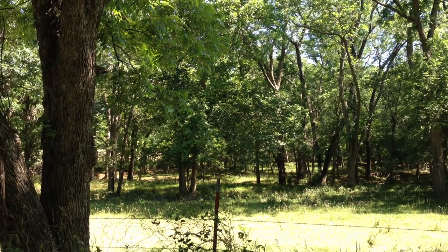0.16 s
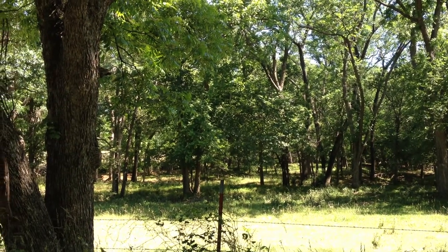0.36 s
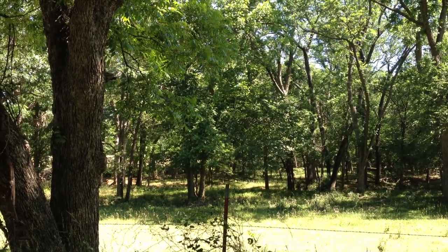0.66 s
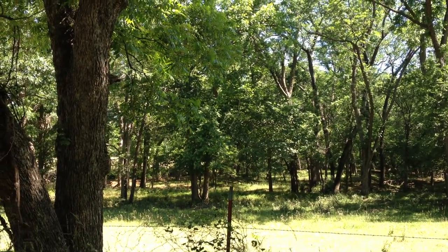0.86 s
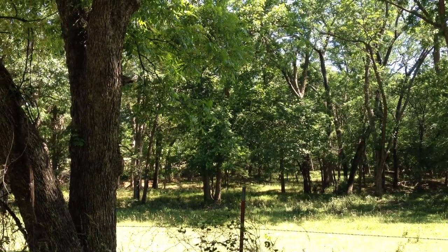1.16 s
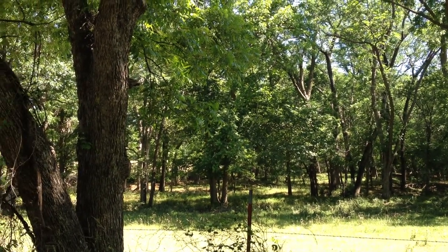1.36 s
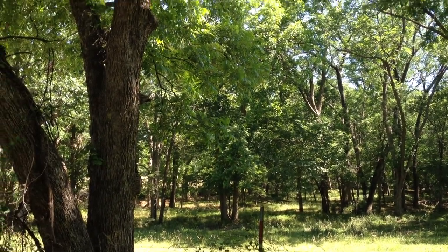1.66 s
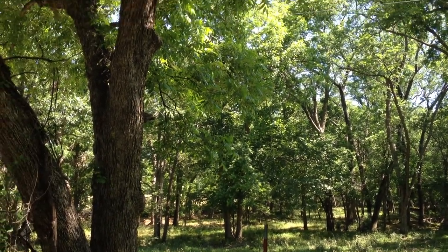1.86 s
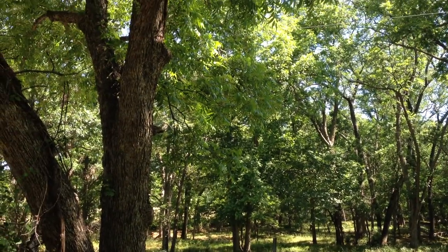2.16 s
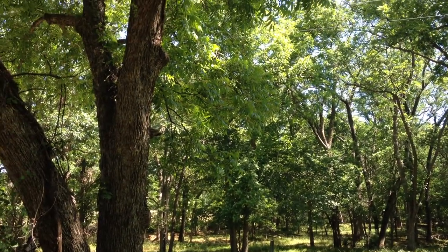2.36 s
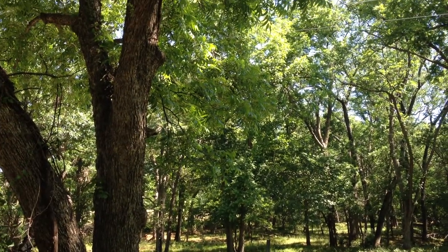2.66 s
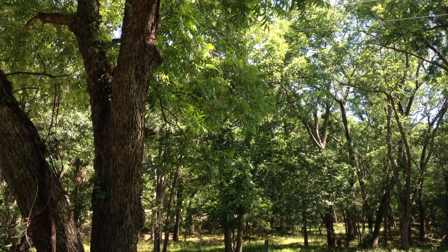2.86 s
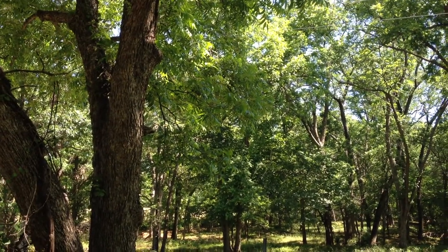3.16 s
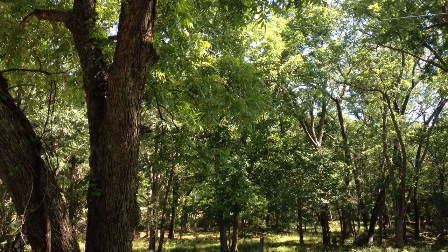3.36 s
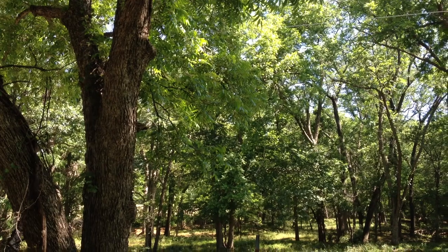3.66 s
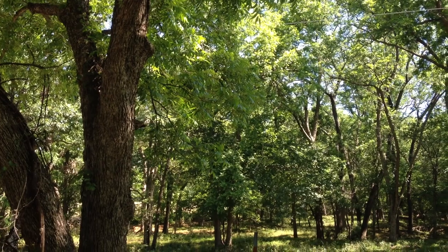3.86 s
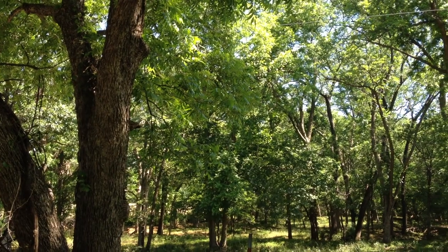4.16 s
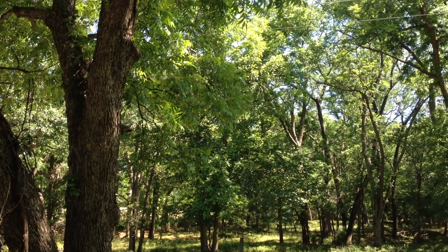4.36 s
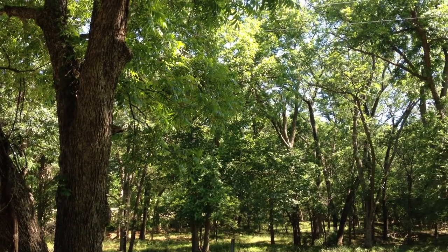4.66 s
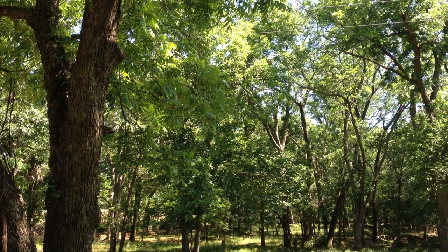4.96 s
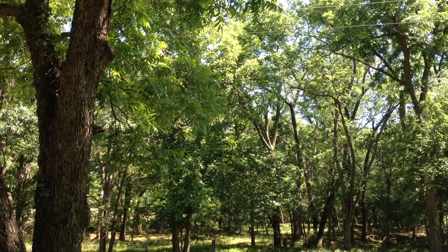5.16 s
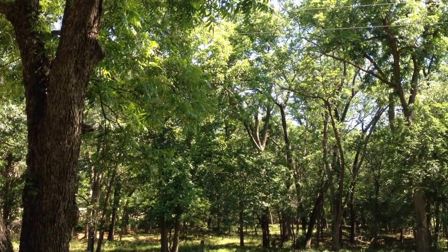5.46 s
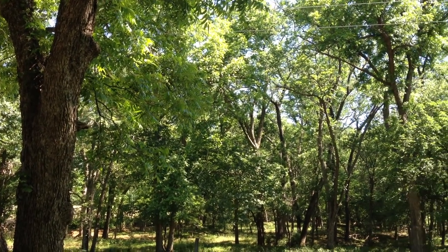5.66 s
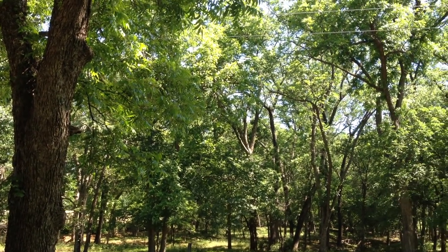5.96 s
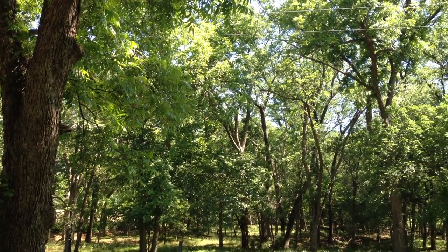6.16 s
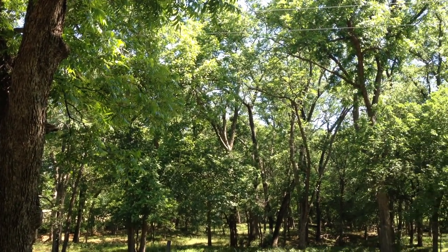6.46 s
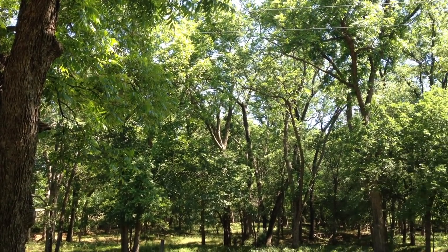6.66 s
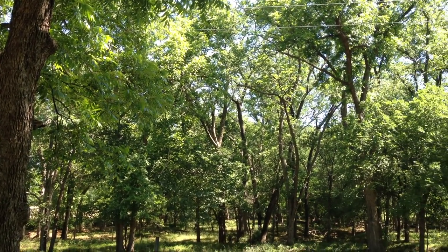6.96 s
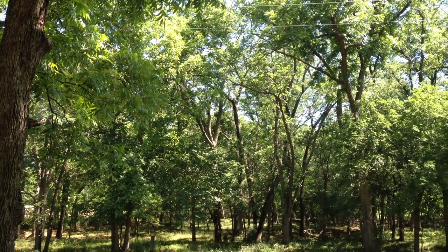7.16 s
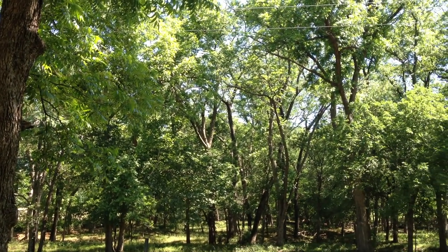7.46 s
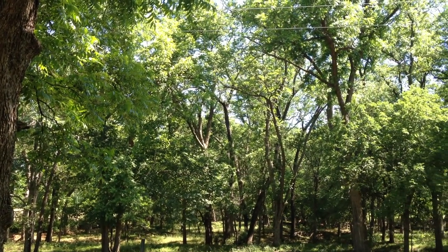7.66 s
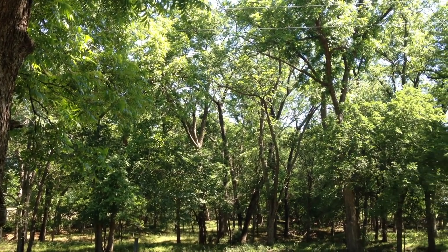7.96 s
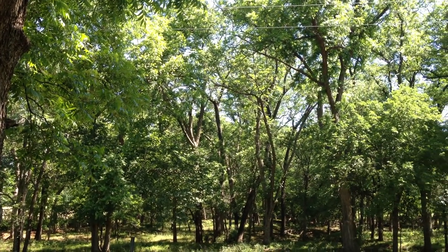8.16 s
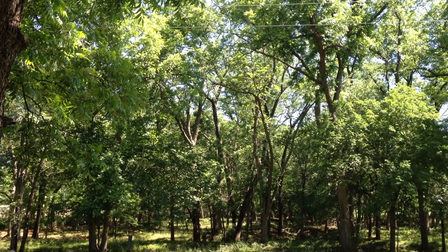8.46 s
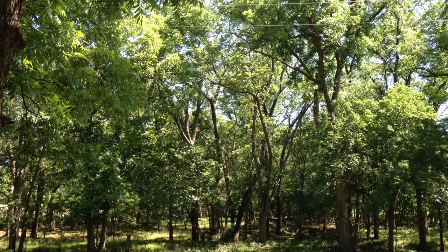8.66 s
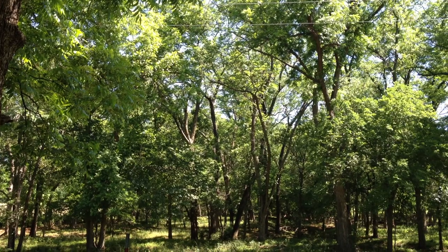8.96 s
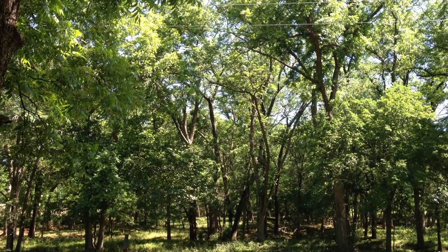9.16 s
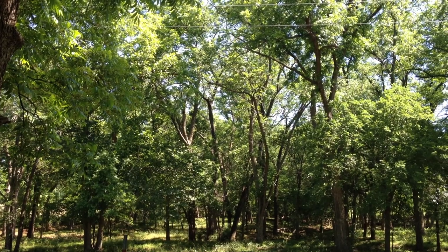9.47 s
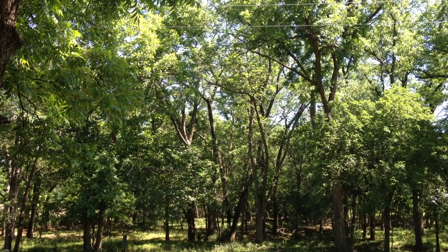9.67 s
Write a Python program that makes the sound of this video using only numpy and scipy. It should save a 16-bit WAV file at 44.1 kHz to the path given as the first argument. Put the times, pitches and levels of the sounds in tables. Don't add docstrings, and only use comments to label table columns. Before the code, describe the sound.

Massed cicadas in the trees make a bright, sizzling, slightly fluttering buzz all around, never silent. It breathes in slow waves: fading first, climbing over several seconds, dropping in about one and a half, then climbing again and starting to fade. Close to the camera microphone, fingers knock and tick softly on hollow plastic. Low handling rumble and thin hiss lie beneath, with one very faint far bird midway.

```python
import sys
import numpy as np
from scipy import signal
from scipy.fft import rfft, irfft, next_fast_len
from scipy.io import wavfile
from scipy.ndimage import uniform_filter1d

SR = 44100
rng = np.random.default_rng(int(sys.argv[2]) if len(sys.argv) > 2 else 0)


def ratio(d):
    e = np.asarray(d, float) / 20
    return 10 ** e


def master_out(mix):
    frames = np.transpose(np.atleast_2d(mix))
    ceiling = np.clip(frames, -1, 1)
    pcm = np.round(ceiling * 32767).astype(np.int16)
    wavfile.write(sys.argv[1], SR, pcm)


N = 432180

# crest_s, crest_level_db, overtone_against_ring_db, rise_s, fall_s
WAVES = [
    (-1.0, -28, 2, 3.8, 1.52),
    (4, -22, -0.7, 3.71, 1.42),
    (9, -22.5, 1.5, 3.26, 2.2),
]


def evened(x):
    return x / np.sqrt(np.mean(x ** 2) + 1e-20)


def colour(x, points, detune=1):
    size = next_fast_len(N)
    hz = np.fft.rfftfreq(size, 1 / SR)
    point_hz, point_db = np.transpose(points)
    gain = ratio(np.interp(np.log(hz + 1), np.log(point_hz * detune), point_db))
    return irfft(rfft(x, size) * gain, size)[:N]


def drift(top_hz, count):
    t = np.arange(0, N + 256, 256) / SR
    rate_hz = np.geomspace(1.5, top_hz, count)[:, None]
    sines = np.sin(2 * np.pi * (rate_hz * t + rng.random((count, 1))))
    slow = evened((sines / np.sqrt(rate_hz)).sum(0))
    return np.interp(np.arange(N) / SR, t, slow)


def add(mix, start_s, sound):
    part = mix[round(start_s * SR):][:len(sound)]
    part += sound[:len(part)]


def wave(lag_s):
    rise_bend, fall_bend, blur_s = 1.29, 1.37, 0.28
    crest_s, _, _, rise_s, fall_s = np.transpose(WAVES)[:, :, None]
    from_crest_s = np.arange(N) / SR - lag_s - crest_s
    rise = np.clip(1 + from_crest_s / rise_s, 0, 1) ** rise_bend
    fall = np.clip(from_crest_s / fall_s, 0, 1) ** fall_bend
    return uniform_filter1d(rise - fall, size=int(blur_s * SR), axis=1)


def tree(detune, flutter_db=0.49):
    # pitch_hz, level_db
    body_ring = [(1400, -65.5), (2100, -39.5), (2900, -30.5), (3300, -24), (3750, -13.5), (4300, -6.5),
                 (4900, -6), (5600, -5.5), (6300, 0), (6750, -4), (7200, -11.5), (7700, -15), (8600, -17),
                 (9200, -26), (9700, -46)]
    # pitch_hz, level_db
    body_overtone = [(9000, -71.5), (9700, -35), (10400, -31), (11400, -25.5), (12500, -27), (13300, -34.5),
                     (14200, -43), (15200, -46.5), (16000, -33)]
    clicks_per_s = 16000
    clicks = rng.choice([-1., 1.], N) * (rng.random(N) < clicks_per_s / SR)
    clicks = clicks * ratio(flutter_db * drift(30, count=24))
    return colour(clicks, body_ring, detune), colour(clicks, body_overtone, detune)


def chorus(size_spread=0.04):
    lull_db = -32.5
    low_buzz_hz, low_lull_db, low_crest_db = 5170, -1.5, -3.37
    low_lag_s, overtone_lag_s = 0.064, 0.063
    overtone_swell = 1.01

    _, crest_db, bright_db, _, _ = np.transpose(WAVES)
    ring_wave, low_wave, overtone_wave = wave(0), wave(low_lag_s), wave(overtone_lag_s)
    swell_db = crest_db - lull_db
    ring_db = lull_db + swell_db @ ring_wave
    low_db = lull_db + swell_db @ low_wave
    low_db = low_db + low_lull_db + (low_crest_db - low_lull_db) * low_wave.sum(0)
    overtone_db = lull_db + overtone_swell * (swell_db @ overtone_wave) + bright_db @ overtone_wave

    trees = [tree(1 + size_spread * d) for d in np.linspace(-1, 1, num=7)]
    ring, overtone = np.sum(trees, axis=0)
    low = colour(ring, [(low_buzz_hz - 400, 0), (low_buzz_hz + 400, -30)])
    high = ring - low
    return (ratio(ring_db) * high + ratio(low_db) * low + ratio(overtone_db) * overtone) / np.std(high)


def camera_floor():
    # pitch_hz, level_db
    rumble_spectrum = [(15, -59), (25, -29), (59, -31), (79, -13.5), (176, -1.5), (394, -8), (528, -8),
                       (605, -10), (659, -10), (1030, -11), (1500, -11), (1950, -15), (3300, -120)]
    rumble_db, rumble_drift_db, hiss_db = -73, .7, -67
    rumble = evened(colour(rng.standard_normal(N), rumble_spectrum))
    hiss = evened(colour(rng.standard_normal(N), [(1000, -18), (1700, 5), (9000, 3.5), (15000, -1)]))
    return ratio(rumble_db + rumble_drift_db * drift(25, count=24)) * rumble + ratio(hiss_db) * hiss


def knocks(tick_s=0.00014, thud_t60=0.054):
    # start_s, thud_db, thud_hz
    finger_pads = [(0.226, -59, 128), (1, -58, 148), (1.375, -58, 169), (1.6835, -56.5, 164),
                   (1.705, -63, 215), (1.9805, -67, 237), (2.0316, -55.5, 172), (3.486, -59, 236),
                   (3.653, -59, 143), (3.9106, -58, 307), (4.1448, -59, 160), (4.2336, -47, 157),
                   (4.663, -55.5, 172), (5.332, -61, 199), (5.6295, -62, 151), (5.7193, -58, 158),
                   (6.096, -64.5, 196), (6.275, -64, 202), (6.9458, -61, 145), (7.367, -64, 180),
                   (7.831, -59, 178), (7.863, -53.5, 170), (8.2943, -58, 178), (8.833, -60, 128),
                   (9.1487, -63, 205)]
    # start_s, tick_db, thud_db
    nail_snaps = [(1.7704, -59, -64), (2.301, -64, -66), (3.508, -55, -54), (3.7889, -59, -63),
                  (4.727, -59, -72), (4.8754, -46, -58), (5.346, -50, -58), (5.3592, -60, -66),
                  (5.7436, -59, -71), (5.9135, -47, -58), (6.028, -53, -59), (6.042, -64, -67),
                  (7.7344, -63, -62)]
    pad_tick_db, pad_firmness = -8.5, .42
    nail_thud_hz = 154
    pads = [(s, db + pad_tick_db + pad_firmness * (db + 60), db, hz) for s, db, hz in finger_pads]
    nails = [(s, tick_db, thud_db, nail_thud_hz) for s, tick_db, thud_db in nail_snaps]

    out, t = np.zeros(N), np.arange(3000) / SR
    lead_s = 90 / SR
    after_s = np.maximum(t - lead_s, 0)
    for start_s, tick_db, thud_db, thud_hz in pads + nails:
        softness_db = .4 * np.clip(thud_db - tick_db + 6, 0, 14)
        u = (t - lead_s) / (tick_s * ratio(softness_db))
        dip, rebound = 0.093 * np.exp(-(u + 5) ** 2 / 9), 0.4 * np.exp(-(u - 5) ** 2 / 9)
        tick = np.exp(-u ** 2 / 2) - rebound - dip
        turns = thud_hz * (.8 * after_s + 0.0044 * (1 - np.exp(-after_s / 0.0027)))
        thud = np.sin(2 * np.pi * turns) * ratio(thud_db + 3.5 - 60 * t / thud_t60)
        add(out, start_s - lead_s, ratio(tick_db + 7.0) * tick + thud)
    return signal.sosfilt(signal.butter(3, 105, "high", fs=SR, output="sos"), out)


def bird():
    # start_s, length_s, start_hz, end_hz, level_db
    peeps = [
        (5.5, .14, 1550, 2050, -77),
        (5.781, .01, 2500, 2040, -55),
        (4.715, 0.036, 400, 370, -65),
    ]
    out = np.zeros(N)
    for start_s, length_s, start_hz, end_hz, level_db in peeps:
        hz = np.linspace(start_hz, end_hz, int(length_s * SR))
        whistle = np.sin(2 * np.pi * np.cumsum(hz) / SR)
        add(out, start_s, ratio(level_db) * np.hanning(len(hz)) * whistle)
    return out


def scene():
    return (chorus() + camera_floor() + knocks() + bird())[None]


def nearby(power):
    over_lines = uniform_filter1d(power, size=21, axis=1)
    return abs(uniform_filter1d(over_lines, size=19, axis=2)) + 1e-24


def treble_gate(x, follow=.15, wander_db=1.1):
    # pitch_hz, threshold_db
    mask = [(8400, -8), (9200, 2.5), (9700, 4.4), (10300, 2.7), (10700, -6), (12300, -3), (13200, 2.3),
            (14200, 5.2), (14900, 3.4), (15300, 2)]
    window = np.sin(np.pi * (np.arange(2048) + .5) / 2048)
    hz, t, z = signal.stft(x, SR, window, nperseg=2048)
    power = abs(z) ** 2 + 1e-24
    ring_band = (hz > 5800) & (hz < 6800)
    ring_db = 10 * np.log10(power[:, ring_band].mean(1, keepdims=True))
    wander = np.repeat(rng.standard_normal((len(t), 33)), 32, axis=1).T[:len(hz)]
    edge_db = np.interp(hz, *np.transpose(mask))[:, None]
    edge_db = edge_db + follow * (ring_db - ring_db.mean()) + wander_db * wander
    kept = (power > nearby(power) * ratio(2 * edge_db)) | (hz < 8300)[:, None]
    lift = np.sqrt(np.clip(nearby(power) / nearby(power * kept), 1, 30))
    return signal.istft(z * kept * lift, SR, window, nperseg=2048)[1][:, :N]


def roll_off(x):
    return signal.sosfilt(signal.butter(12, 15330, fs=SR, output="sos"), x)


def record(dry):
    return roll_off(treble_gate(dry))


dry = scene()
out = record(dry)
master_out(out)
```